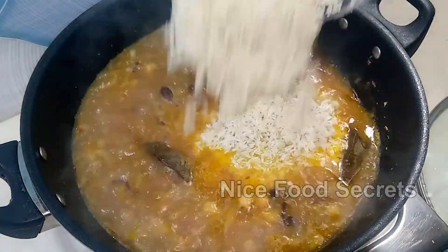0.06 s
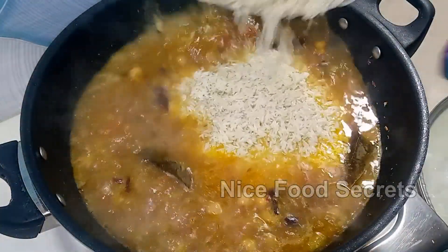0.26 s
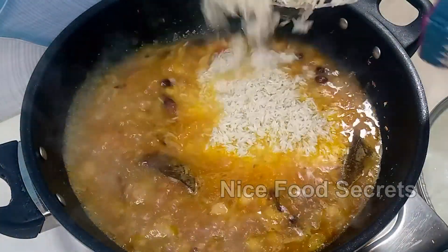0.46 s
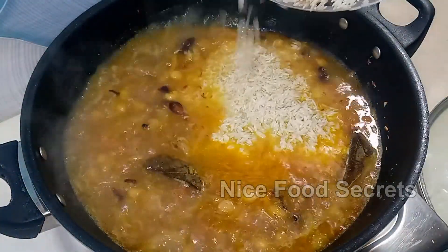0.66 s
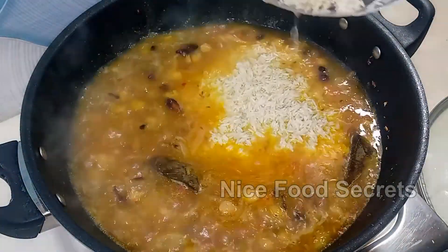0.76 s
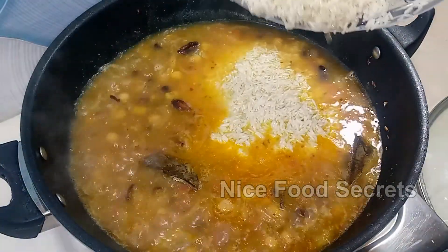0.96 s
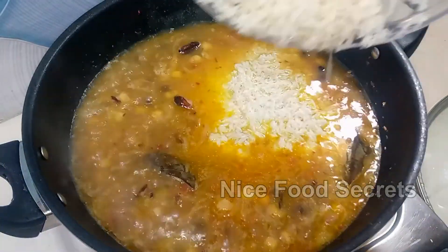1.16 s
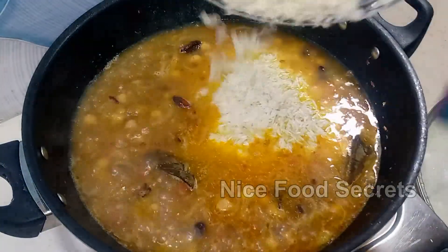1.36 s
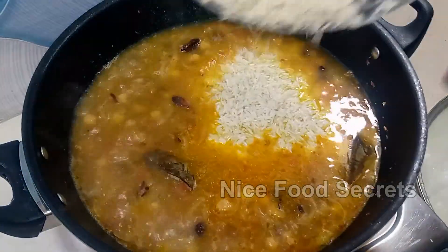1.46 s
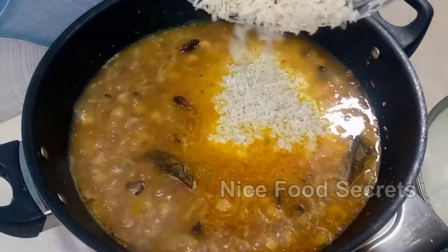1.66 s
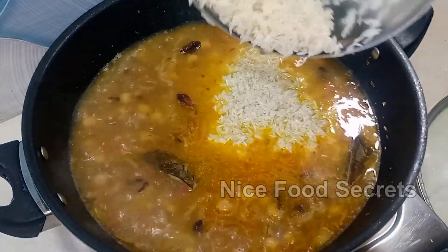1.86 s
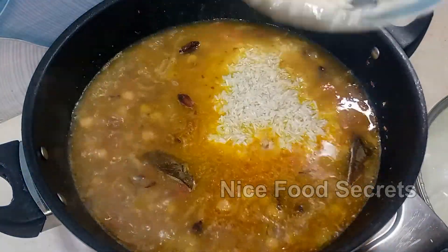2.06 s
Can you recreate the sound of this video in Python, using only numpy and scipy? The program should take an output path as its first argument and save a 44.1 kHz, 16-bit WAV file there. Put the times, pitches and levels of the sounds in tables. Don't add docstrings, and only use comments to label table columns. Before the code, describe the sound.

Rice pours into simmering stock with a brief bright splash that deepens, then a sharp smack with short echo, two grain sprinkles and small clinks, over steady hiss in a small kitchen, close microphone.

```python
import sys
import numpy as np
from scipy import signal
from scipy.fft import rfft, irfft
from scipy.io import wavfile

SR = 44100
rng = np.random.default_rng(int(sys.argv[2]) if len(sys.argv) > 2 else 0)


def dump_mix(stems):
    frames = np.atleast_2d(stems).T
    limited = np.clip(frames, -1, 1)
    pcm = np.round(limited * 32767).astype(np.int16)
    wavfile.write(sys.argv[1], SR, pcm)


def invert_db(x):
    u = np.asarray(x, float) / 20
    return 10 ** u


N = 92610
T = np.arange(N) / SR


def rms_one(x):
    return x / np.sqrt(np.mean(x ** 2) + 1e-20)


def drift(rate_hz):
    r = np.exp(-80 * np.pi * rate_hz / SR)
    noise = rng.standard_normal(N // 40 + 2002)
    slow = signal.lfilter([1], [1, -2 * r, r * r], noise)[2000:]
    return np.interp(np.arange(N) / 40, np.arange(len(slow)), rms_one(slow))


def colour(x, spectrum):
    points = np.array(spectrum)
    hz = np.fft.rfftfreq(N, 1 / SR) + 1
    level_db = np.interp(np.log(hz), np.log(points[:, 0]), points[:, 1], left=-90, right=-90)
    return rms_one(irfft(rfft(x) * invert_db(level_db), N))


def grains(per_s, spread_db, wash):
    size = invert_db(spread_db * np.minimum(rng.exponential(1, N), 3)) * rng.choice([-1, 1], N)
    clicks = rms_one(size * (rng.random(N) < per_s / SR))
    return rms_one(clicks + wash * rng.standard_normal(N))


def resonate(x, hz, width_hz):
    r = np.exp(-np.pi * width_hz / SR)
    return signal.lfilter([1, 0, -1], [1, -2 * r * np.cos(2 * np.pi * hz / SR), r * r], x + 1e-18)


def pings(per_s, low_hz, high_hz, cycles, count):
    total = np.zeros(N)
    for hz in np.geomspace(low_hz, high_hz, count):
        width_hz = hz / cycles
        total += rms_one(resonate(grains(per_s / count, 3.5, 0), hz, width_hz)) * np.sqrt(width_hz)
    return rms_one(total)


def tones(rows, levels_db, rise, sag_db, wobble_db, wander):
    out = np.zeros(N)
    phases = rng.random(len(rows))
    slip = wander * drift(19.5)
    for (start, length, hz), db, phase in zip(rows, levels_db, phases):
        u = (T - start) / length
        fade_db = -sag_db * np.clip(u, 0, 1) - 45 * np.clip(u - 0.85, 0, 4)
        shape = np.clip(u / rise, 0, 1) * invert_db(fade_db)
        out += invert_db(db + 3.5) * shape * np.sin(2 * np.pi * (hz * T + phase + slip))
    return out * invert_db(wobble_db * drift(60.0))


# time in seconds, level in dB, level of the deep part in dB.
POUR = [
    (0.185, -58, -3),
    (0.195, -43.5, -16),
    (0.265, -27, 1),
    (0.283, -34.5, 1),
    (0.334, -46, 12),
]
# pitch in Hz, level in dB per Hz.
SPLASH = [(240, -28), (400, -27), (1160, -21), (1310, -24.5), (3580, -5), (4050, -10.5), (6950, -2),
          (9040, -27), (16000, -36)]


def splash(rattle):
    time, level_db, depth_db = np.transpose(POUR)
    fade_db = 187 * np.maximum(T - time[-1], 0)
    level = (T > time[0]) * invert_db(np.interp(T, time, level_db) - fade_db)
    bright = colour(rattle, SPLASH)
    deep = signal.sosfiltfilt(signal.butter(2, 4200, fs=SR, output="sos"), bright)
    return level * (bright - deep + deep * invert_db(np.interp(T, time, depth_db)))


# peak in seconds, rise in seconds, time to fall 60 dB in seconds.
SPRINKLES = [
    (.568, .014, .09),
    (1.486, .016, .13),
    (.685, .05, .3),
    (1.622, .005, .15),
    (1.83, .04, .2),
    (.08, .05, .3),
    (.556, .002, .07),
    (1.5, .02, .26),
]
SPRINKLE_DB = [-34.5, -38, -48.5, -53.5, -55.5, -52, -48, -57]
# pitch in Hz, level in dB per Hz.
FIRST_SPRINKLE = [(880, -47), (1500, -42), (3000, -1.5), (4590, -12), (6890, 3), (10700, -8.5),
                  (11900, -26), (15100, -12), (16000, -1)]
SECOND_SPRINKLE = [(290, -103), (500, -19), (919, -27), (1720, -26), (1900, -34), (2850, -24.5), (6610, -7),
                   (10700, -29), (16000, -27)]
DRIZZLE = [(1470, -55), (2500, -15), (4390, 1), (4780, 7), (5860, -23), (7110, -11), (9000, -32),
           (11700, -54), (19800, -120)]


def sprinkles(rattle):
    out = np.zeros(N)
    tints = (FIRST_SPRINKLE, SECOND_SPRINKLE, SPLASH, FIRST_SPRINKLE, SPLASH, SPLASH, ECHO, DRIZZLE)
    for (peak, rise, t60), db, tint in zip(SPRINKLES, SPRINKLE_DB, tints):
        swell = np.clip(1 + (T - peak) / rise, 0, 1) ** 2
        decay = invert_db(-60 * np.maximum(T - peak, 0) / t60)
        out += invert_db(db) * np.where(T < peak, swell, decay) * colour(rattle, tint)
    return out


def rice():
    rattle = rms_one(pings(5000, 1200, 14000, 45.0, count=30) + 1.1 * rng.standard_normal(N))
    return splash(rattle) + sprinkles(rattle)


# start in seconds, low edge in Hz, high edge in Hz.
SMACKS = [(.3419, 1950, 3500), (.3418, 1050, 1950), (.3453, 1800, 3600), (.484, 3500, 4100),
          (.5545, 2100, 3700), (.5644, 6400, 10800), (.2965, 3000, 8000), (.218, 6500, 10500),
          (.69, 3600, 5200), (.2595, 5000, 7800), (.2642, 3200, 7600), (.2785, 4500, 7600),
          (.2415, 2800, 7500), (1.4743, 5800, 7400), (1.4825, 5800, 8000), (1.4878, 5000, 8500),
          (1.4655, 5400, 6600), (1.8, 3800, 4800), (1.829, 2200, 4800), (1.618, 3900, 4700),
          (.5652, 6600, 10500), (.5588, 6200, 9000), (.484, 1400, 2600)]
SMACK_DB = [-5.5, -17, -19, -42, -31, -18.5, -28, -35, -43, -19, -22, -31, -32, -32, -31, -29, -38, -46,
            -46, -45, -22, -27, -36]
# pitch in Hz, level in dB per Hz.
ECHO = [(290, -54), (500, -13), (871, -27), (1090, -5.5), (1590, -10), (2900, 1), (4560, -21), (6050, -4),
        (7500, -20), (9750, -29), (16500, -120)]


def smacks():
    out = np.zeros(N)
    for (start, low_hz, high_hz), db in zip(SMACKS, SMACK_DB):
        click = np.full(N, 1e-18)
        click[int(start * SR)] = invert_db(db + 17)
        out += signal.sosfilt(signal.butter(4, [low_hz, high_hz], "band", fs=SR, output="sos"), click)
    echo_db, gap_s, t60_s = -27.5, 0.002, 0.19
    age = T - SMACKS[0][0]
    tail = invert_db(echo_db - 60 * np.maximum(age, 0) / t60_s) * np.clip(age / gap_s, 0, 1) ** 2
    answer = pings(6000, 900, 5200, 20.0, count=20) + 1.3 * rng.standard_normal(N)
    return out + tail * colour(answer, ECHO)


# time in seconds, pitch in Hz, level in dB.
POCKETS = [
    [(0.14, 328, -75), (0.164, 327, -55.5), (0.232, 324.5, -51.5), (0.246, 357, -48.5), (0.276, 322, -62),
     (0.294, 328, -45), (0.304, 308, -55), (0.342, 298, -61), (0.35, 296, -76)],
    [(0.43, 577, -57), (0.444, 583, -60.5), (0.482, 584, -54), (0.49, 591, -82), (0.51, 577, -51.5),
     (0.644, 564, -73.5), (0.754, 602, -65), (0.78, 460, -85), (0.79, 440, -74)],
]


def pockets():
    out = np.zeros(N)
    for time, hz, db in map(np.transpose, POCKETS):
        level = invert_db(np.interp(T, time, db, left=-120, right=-120) + 3)
        cycles = np.cumsum(np.interp(T, time, hz)) / SR
        out += level * np.sin(2 * np.pi * cycles)
    return out * invert_db(3 * drift(30.0))


# start in seconds, length in seconds, pitch in Hz.
TONES = [(1.786, .013, 6770), (1.8, .012, 6770), (1.812, .022, 6770), (1.79, .06, 7750), (1.622, .03, 7770),
         (1.616, .014, 4260), (1.62, .012, 6950), (1.655, .05, 5930), (1.71, .035, 5930),
         (1.885, .11, 5950), (.872, .012, 10400), (1.375, .06, 2120), (2.02, .05, 2110), (1.7, .07, 2990),
         (1.255, .1, 2990), (.81, .025, 3520), (.222, .02, 7350), (.232, .025, 1420), (1.474, .007, 6800),
         (1.482, .008, 6700), (1.49, .008, 5900), (1.473, .008, 11200), (1.456, .008, 5900),
         (.252, .02, 7150), (.262, .01, 3500), (.26, .008, 4900), (.197, .015, 4200), (.2, .01, 2950),
         (.345, .035, 4880), (.349, .03, 5930), (.315, .02, 3530), (.305, .012, 6250), (.5705, .008, 7050),
         (.6, .005, 6800), (1.63, .035, 4290), (1.81, .05, 3000), (1.43, .03, 3000), (1.66, .06, 2110),
         (.06, .1, 2950), (.348, .014, 3050), (.62, .03, 2950), (1.95, .12, 5950)]
TONE_DB = [-36, -33, -48, -55, -52.5, -57, -45, -45, -45, -48, -56.5, -64.5, -69, -68, -64.5, -59, -39, -55,
           -23, -36, -42.5, -56.5, -48, -34, -39, -30, -49, -52, -54.5, -40, -41.5, -50, -36, -46, -70, -67,
           -70, -71, -66, -34.5, -66, -53.5]


def clinks():
    return tones(TONES, TONE_DB, rise=0.2, sag_db=4, wobble_db=2.2, wander=0.2)


# start in seconds, length in seconds, pitch in Hz.
GLUGS = [(.47, .1, 655), (1.04, .07, 288), (1.105, .03, 400), (1.79, .05, 800), (1.5, .04, 300),
         (.78, .24, 296), (.49, .06, 288), (1.41, .04, 505), (.24, .05, 605), (.56, .2, 290),
         (1.13, .04, 630), (1.47, .04, 910), (.06, .1, 800), (1.96, .1, 130)]
GLUG_DB = [-66, -60, -58.5, -63, -64.5, -69, -60.5, -66.5, -62.5, -68.5, -65, -64, -66.5, -62]


def glugs():
    return tones(GLUGS, GLUG_DB, rise=0.25, sag_db=6.0, wobble_db=2.2, wander=0.07)


def patchy(x, patchy_db, together_db):
    spectrum = rfft(x)
    octave = 4 * np.log2(np.fft.rfftfreq(N, 1 / SR) + 1)
    shared_db = together_db * drift(4.7)
    out = np.zeros(N)
    for k in range(18, 58, 2):
        band = irfft(spectrum * np.clip(1 - abs(octave - k) / 2, 0, 1), N)
        out += band * invert_db(shared_db + patchy_db * drift(14.0))
    return out


# time in seconds, level in dB.
HEAT = [(0.0, -47), (0.38, -49.5), (0.68, -48), (0.85, -50.5), (1.69, -55), (1.8, -51.5), (2.1, -55)]
# pitch in Hz, level in dB per Hz.
HISS = [(2240, -94), (3800, -20), (4620, -15.5), (5010, -16), (5200, -10), (6160, -2), (6650, -7.5),
        (7430, -11.5), (9500, -38), (12400, -120), (20900, -120)]
AIR = [(5290, -46), (9000, -2), (10600, -8), (13600, -9), (15100, 7), (16200, -19)]
# pitch in Hz, level in dB per Hz.
MURMUR = [(15, -69), (25, -32), (81, 3), (234, -5.5), (285, -6), (535, -8.5), (651, -11), (2290, -11.5),
          (4500, -19.5), (5850, -30), (9900, -120)]
# pitch in Hz, width in Hz, level in dB.
WHISTLES = [(5954, 30, -54.5), (5700, 20, -58), (6180, 77, -60), (5470, 120, -60.5), (6850, 300, -63.5),
            (2972, 87, -70.5), (2098, 42, -77.5), (1486, 59, -76), (287.6, 15, -72), (484.3, 11, -78.5)]


def simmer():
    heat_db = np.interp(T, *np.transpose(HEAT))
    swing_db = heat_db - heat_db.mean()
    air_db = -66.5 - heat_db.mean() - 4.0
    fizz = colour(grains(5500, 9, wash=1.3), HISS)
    fizz = fizz + invert_db(air_db) * colour(grains(2200, 9, wash=1.2), AIR)
    hiss = invert_db(heat_db - 1.0) * patchy(fizz, patchy_db=2.6, together_db=1.84)
    room = patchy(colour(rng.standard_normal(N), MURMUR), patchy_db=1.3, together_db=0.3)
    murmur = invert_db(-64 + 0.64 * swing_db) * room
    whistles = np.zeros(N)
    for hz, width_hz, db in WHISTLES:
        line = rms_one(resonate(rng.standard_normal(N), hz, width_hz))
        whistles += invert_db(db + 1.52 * drift(3.3)) * line
    bubbles = invert_db(-72 + swing_db) * pings(130, 418, 4320, 50.0, count=12)
    return hiss + murmur + invert_db(0.24 * swing_db) * whistles + bubbles


# start in seconds, length in seconds, pitch in Hz.
THUDS = [(.04, .06, 110), (.242, .085, 133), (.35, .09, 112), (.69, .075, 122), (1.104, .05, 118),
         (1.458, .04, 135), (1.762, .022, 115), (2.075, .04, 125)]
THUD_DB = [-60.5, -47.5, -54.5, -59, -54, -53, -53, -52.5]
# pitch in Hz, level in dB per Hz.
SCUFF = [(88, 11), (150, -5), (367, 2.5), (503, -13.5), (805, -5), (1300, -16), (1690, -59), (2860, -120)]


def steps():
    scuff_db, lag_s, scuff_s = -9, 0.038, 0.042
    trail = np.zeros(N)
    for (start, _, _), db in zip(THUDS, THUD_DB):
        trail += invert_db(db + scuff_db) * np.exp(-((T - start - lag_s) / scuff_s) ** 2)
    thuds = tones(THUDS, THUD_DB, rise=0.4, sag_db=3.0, wobble_db=2.0, wander=0.12)
    return thuds + trail * colour(rng.standard_normal(N), SCUFF)


def scene():
    return (rice() + smacks() + pockets() + clinks() + glugs() + simmer() + steps())[None]


def band_limit(x):
    return signal.sosfilt(signal.butter(12, 16820, fs=SR, output="sos"), x)


def record(dry):
    below_cutoff = np.fft.rfftfreq(N, 1 / SR) < 15930
    mix = irfft(rfft(dry) * below_cutoff, N)
    return band_limit(mix)


dry = scene()
out = record(dry)
dump_mix(out)
```